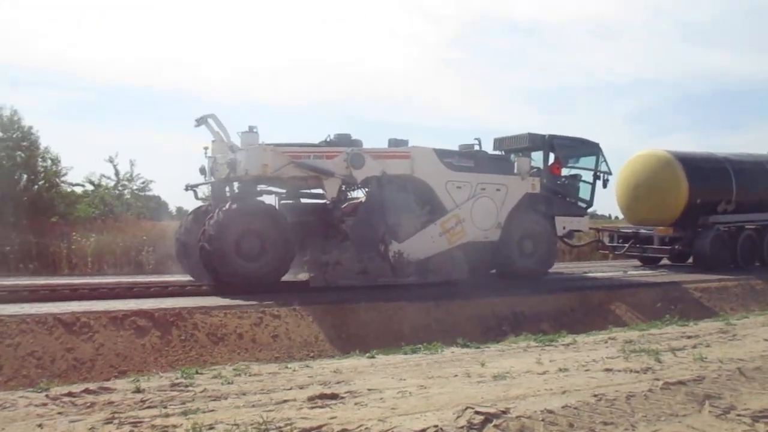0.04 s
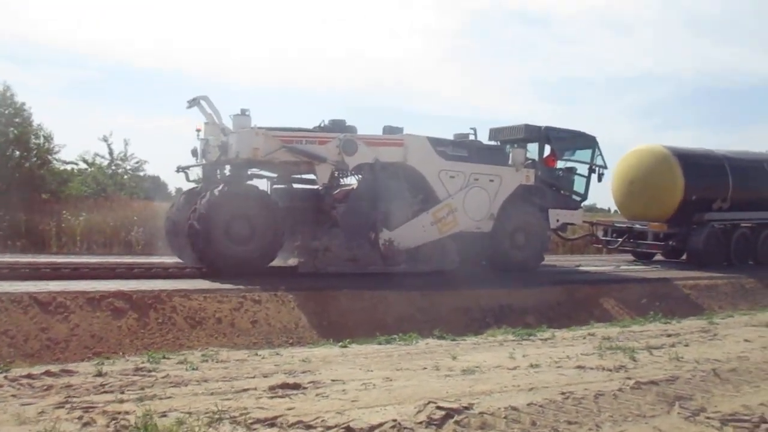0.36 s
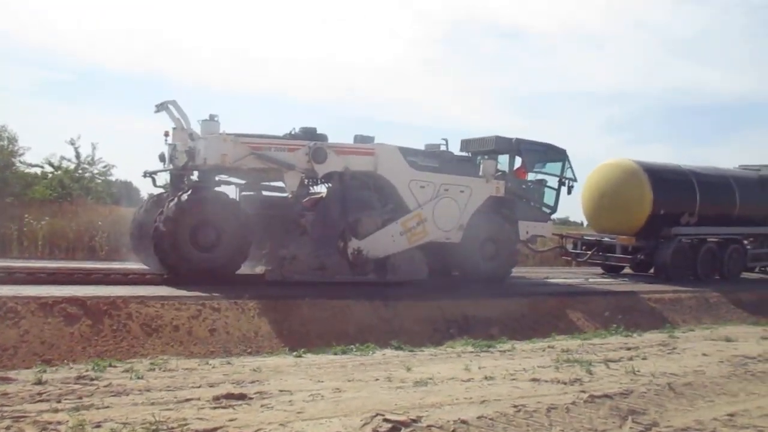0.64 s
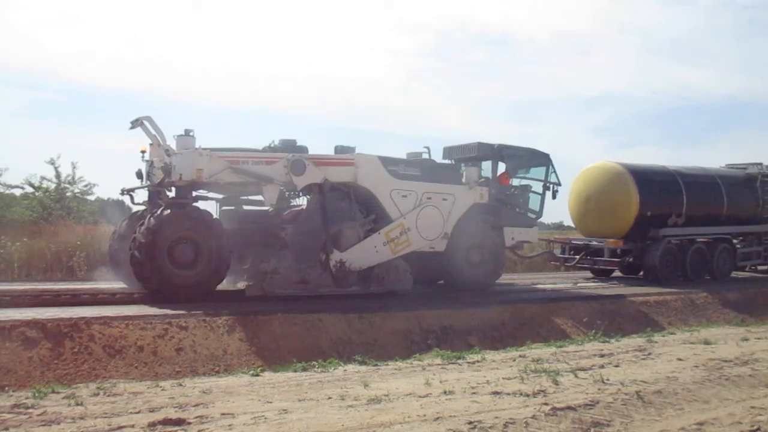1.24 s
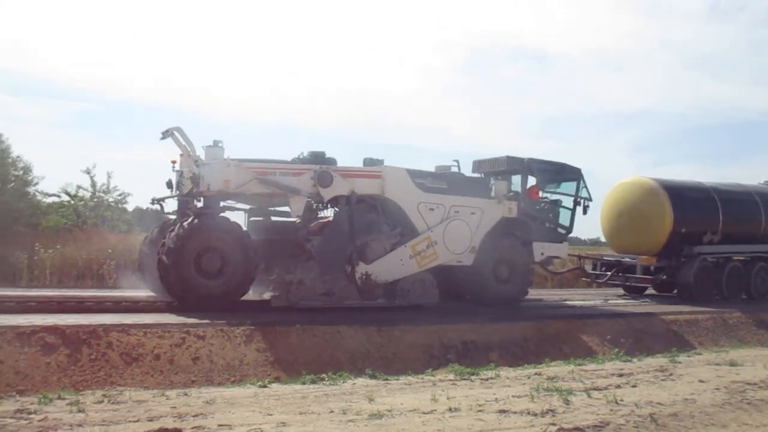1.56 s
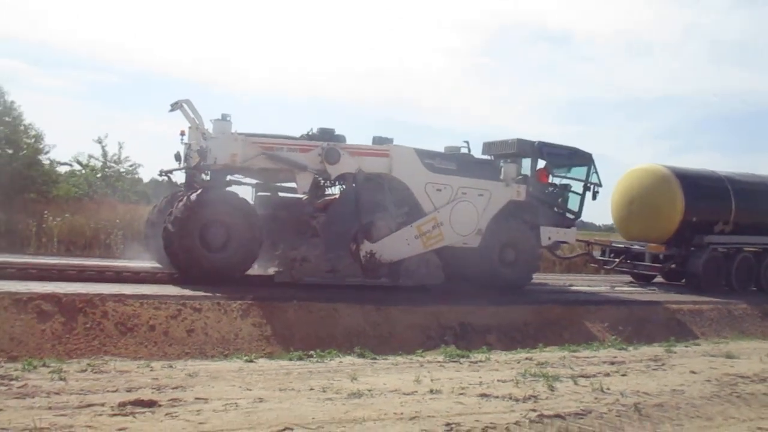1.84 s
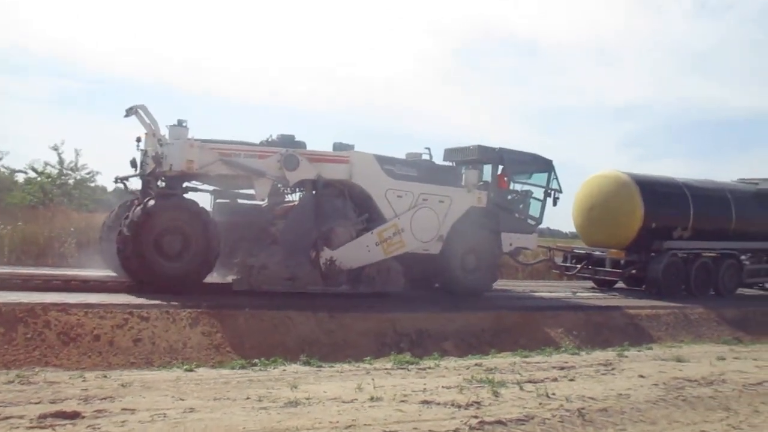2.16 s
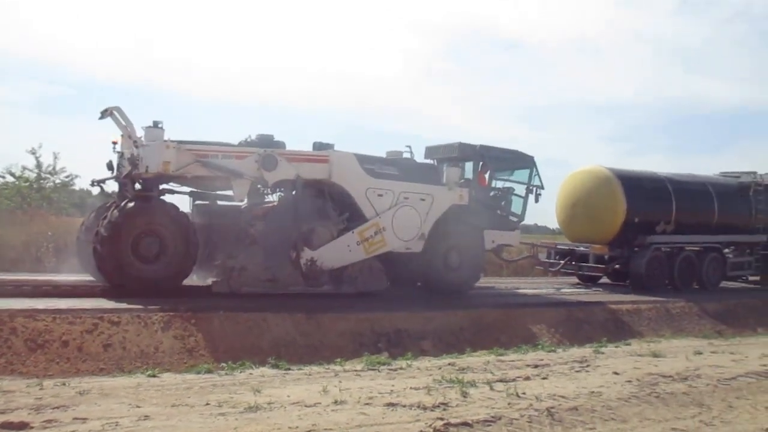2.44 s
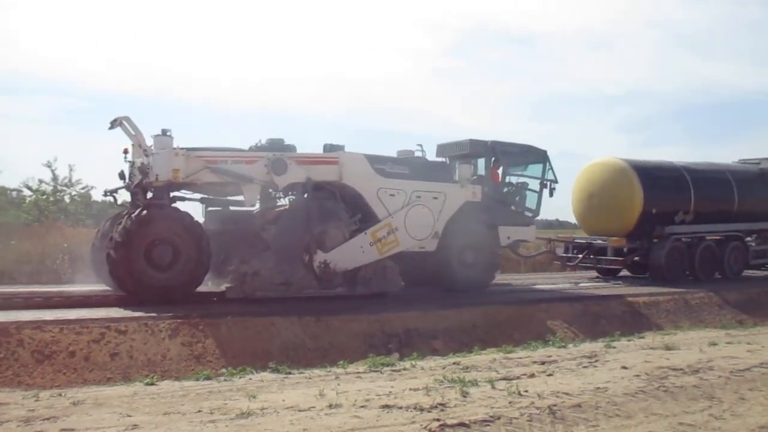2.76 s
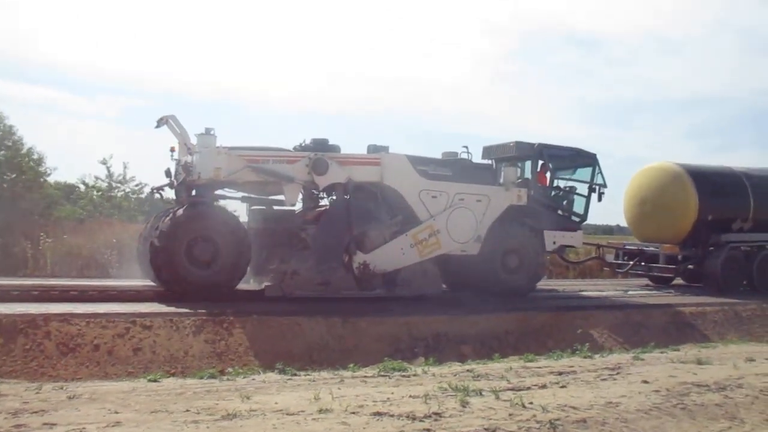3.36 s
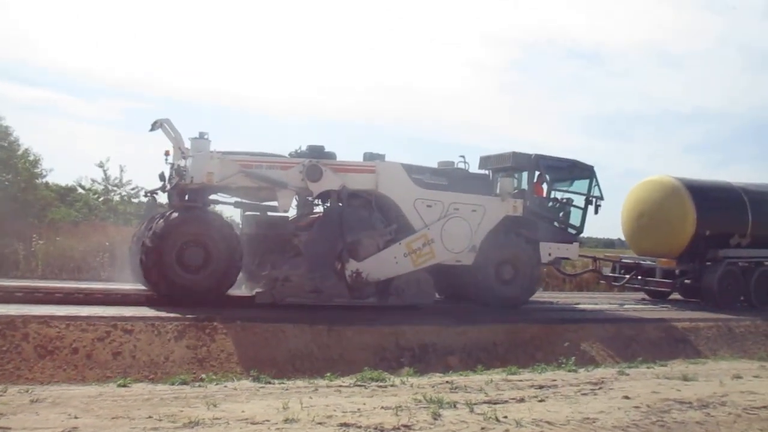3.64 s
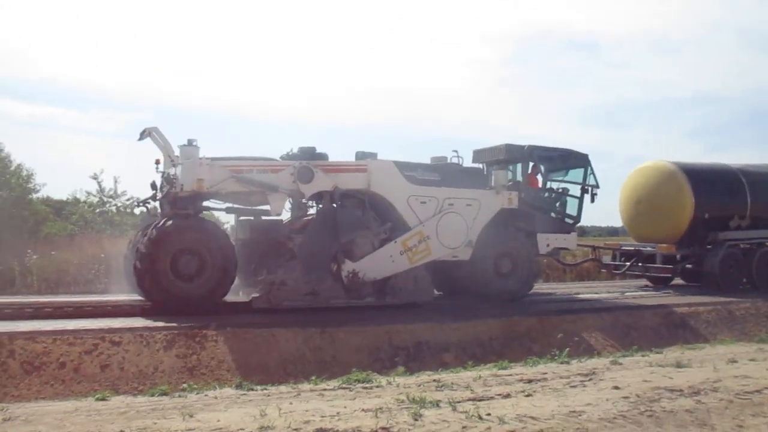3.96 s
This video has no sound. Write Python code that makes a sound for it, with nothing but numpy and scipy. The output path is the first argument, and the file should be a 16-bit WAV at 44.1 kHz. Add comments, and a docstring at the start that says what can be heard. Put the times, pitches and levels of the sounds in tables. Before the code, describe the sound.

A road recycling machine works steadily on open ground, its diesel engine droning and throbbing under the gritty roar of the milling drum. A gear whine and faint whistles sit on top, with occasional stone knocks, heard from some distance.

```python
"""Open ground, a hand-held microphone some twenty metres from a road recycler creeping past under load.
A six-cylinder diesel drones over the throb of a heavy, unbalanced shaft. The milling drum churns
asphalt and throws stones that ring its hood. A gear whines and a hydraulic pump hums. Thin whistles
and a steady, high electronic tone with a faint 30 Hz flutter lie on top.
The overall level dips abruptly a few times and creeps back."""
import sys
import numpy as np
from scipy import signal
from scipy.fft import rfft, irfft
from scipy.io import wavfile
from scipy.ndimage import uniform_filter1d, map_coordinates

SR = 44100
rng = np.random.default_rng(int(sys.argv[2]) if len(sys.argv) > 2 else 0)


def dump_mix(stems):
    """Bounce the given channels to the path in sys.argv[1] as a 16-bit WAV at rate SR."""
    frames = np.atleast_2d(stems).T  # one column per channel
    limited = np.clip(frames, -1, 1)  # hard clip at full scale
    pcm = np.round(limited * 32767).astype(np.int16)
    wavfile.write(sys.argv[1], SR, pcm)


N = 176400


def undb(db):
    """Decibels to gain."""
    return 10 ** (np.asarray(db) / 20)


def walk(per_s):
    """Smooth random drift that changes about per_s times a second; spread near 1."""
    hold = int(SR / per_s)
    steps = np.repeat(rng.standard_normal(N // hold + 3), hold)
    return 1.16 * uniform_filter1d(uniform_filter1d(steps, hold), hold)[hold:hold + N]


def turns(hz):
    """Angle of something that turns at hz."""
    return 2 * np.pi * np.cumsum(hz) / SR


def tone(angle, db):
    """A sine of a given rms level that starts anywhere in its cycle."""
    return np.sqrt(2) * undb(db) * np.sin(angle + rng.uniform(0, 2 * np.pi))


def curve(t, table, column=1):
    """One column of a table, joined by straight lines."""
    table = np.array(table)
    return np.interp(t, table[:, 0], table[:, column])


# dips of the overall level: t/s, depth/dB
DIPS = [(0, 4), (.14, 1.5), (.95, 0.5), (1.48, 1), (1.905, 2.8), (2.89, 3.5)]

def level_dips(t, fall_s=0.0064, recovery_s=0.45, gain_db=0.35):
    """Gain at the microphone: it drops quickly and recovers slowly."""
    down_db = 0
    for start, depth_db in DIPS:
        age = np.maximum(t - start, 0)
        down_db += depth_db * (1 - np.exp(-age / fall_s)) * np.exp(-age / recovery_s)
    return undb(gain_db - down_db)


# a faint reflection close to the microphone: t/s, lag/ms
REFLECTION_LAG = [(0, 1.235), (1.15, 1.25), (1.5, 1.285), (1.9, 1.255), (2.95, 1.262), (3.1, 1.22),
                  (4, 1.205)]

def add_reflection(t, sound, share=.42, from_hz=6500):
    """The treble arrives twice and combs; the lag shifts as the hand-held microphone moves."""
    hz = np.arange(N // 2 + 1) * SR / N
    treble = irfft(rfft(sound) * (1 - np.exp(-(hz / from_hz) ** 4)), N)
    late_index = (t - curve(t, REFLECTION_LAG) / 1000) * SR
    return sound + share * map_coordinates(treble, [late_index], mode="mirror")


# a faint line just below the gear whine, thin whistles, and an electronic tone (the pair near 11.8 kHz): f/Hz,
# level/dB, pitch wander as a share
HIGH_TONES = [(2278, -50.5, .001), (2890, -49, .005), (3420, -54, .006), (10215, -69.5, .002),
              (11793, -64.5, .00005), (11823, -73, .00005), (14610, -78, .003)]

def high_tones():
    """A faint line below the gear whine and thin whistles wander; a steady electronic tone beats with a weak
    neighbour, a faint 30 Hz flutter."""
    return sum(tone(turns(hz * (1 + wander * walk(60))), db + .5 * walk(12))
               for hz, db, wander in HIGH_TONES)


def pump_hum(t, crank, multiple=12.98, start_db=-40, rise_db_per_s=2.5):
    """The hydraulic pump turns with the crank; its hum grows as the machine goes by."""
    return tone(multiple * crank, start_db + rise_db_per_s * t + 1.3 * walk(9.9))


# the drive under load: t/s, engine speed/rpm, relative whine level/dB
DRIVE = [(0, 2008, -43), (.5, 2006, -42.5), (.8, 2016, -42.5), (1, 2012, -40), (1.35, 2013, -36.5),
         (1.8, 2016, -34.5), (2, 2008, -40.5), (2.5, 2013, -39), (2.85, 2018, -35.5), (3.05, 2012, -39.5),
         (3.2, 2013, -36), (3.55, 2021, -36.5), (4, 2021, -40)]
# gear mesh, its sidebands and weaker meshes: multiple of the crank speed, level/dB re the whine
GEAR_LINES = [(70.1, 1), (72, -15), (76.2, -30), (139, -22), (140.2, -22)]

def gear_whine(t, crank, gain_db=-1, waver_db=1.5):
    """Meshing teeth sing with the engine, unsteady in phase and level."""
    whine_db = curve(t, DRIVE, column=2) + gain_db
    return sum(tone(multiple * crank + 0.28 * walk(40), whine_db + db + waver_db * walk(45))
               for multiple, db in GEAR_LINES)


# low thumps: t/s, peak level/dB
THUMPS = [(1.903, -3), (2.889, -5)]

def thumps(t, width_s=0.0015):
    """Two dull blows, each a single pulse with no ring."""
    return sum(undb(db) * np.exp(-((t - start) / width_s) ** 2) for start, db in THUMPS)


# stones striking the hood: t/s, level/dB
STONES = [(.351, -9), (.837, -15), (1.477, -10), (2.174, -15), (2.353, -13), (2.64, -14), (2.688, -14),
          (3.385, -14), (3.888, -11)]
# modes of the hood: f/Hz, level/dB re the strike, t60/s
HOOD_MODES = [(290, -10.5, 0.046), (392, 1, 0.035), (610, -24, .04), (724, -3.5, 0.044), (798, -3, 0.054),
              (1130, -4, 0.018), (1850, -12, 0.022)]

def stone_knocks(t, contact_s=.0007, detune=0.033):
    """Larger stones ring the hood briefly, each at slightly different pitches."""
    out = np.zeros(N)
    for start, db in STONES:
        age = np.maximum(t - start, 0)
        attack = 1 - np.exp(-age / contact_s)
        for hz, mode_db, t60 in HOOD_MODES:
            pitch = hz * (1 + detune * rng.standard_normal())
            decay = np.exp(-np.log(1000) * age / t60)
            out += undb(db + mode_db) * attack * decay * np.sin(2 * np.pi * pitch * age)
    return out


def grit_and_air(crank, grains_per_s=7000, spread_db=2.5, grit_share=.3, pulse_depth=0.036):
    """Dense grit from the drum and rushing air that pulses with the engine, mixed by power."""
    hits = rng.random(N) < grains_per_s / SR
    grit = hits * rng.standard_normal(N)
    grit *= undb(spread_db * np.minimum(rng.exponential(size=N), 4))
    pulses = np.cos(3 * crank) + np.cos(2 * crank) + np.cos(crank / 2)
    air = rng.standard_normal(N) * (1 + pulse_depth * pulses)
    return np.sqrt(grit_share) * grit / grit.std() + np.sqrt(1 - grit_share) * air / air.std()


# drum, fan and engine block from twenty metres: f/Hz, level/dB per Hz
ROAR_SPECTRUM = [(15, -64), (25, -67), (40, -44.5), (70, -46), (200, -45.5), (280, -42), (340, -46),
                 (400, -44.5), (480, -52.5), (560, -52), (720, -46.5), (830, -48), (950, -53), (1200, -53),
                 (1480, -60), (1870, -59), (2150, -69), (2380, -63.5), (2650, -66.5), (2900, -64),
                 (3400, -67), (3900, -72.5), (4700, -72.5), (6000, -76.5), (6800, -82.5), (8300, -84.5),
                 (10000, -90), (11200, -94.5), (12500, -98), (14500, -102), (15500, -106)]
# swell of the hood's ring in the roar: t/s, level/dB
HOOD_SWELL = [(0, 1), (.55, -1.5), (.85, -0.5), (1.1, -1), (1.45, 2), (1.8, -0.5), (2.2, -1), (2.68, 1.8),
              (3, -0.4), (3.4, 0.5), (3.6, 0), (3.85, 3), (4, -1)]
# swell of the low rumble: t/s, level/dB
RUMBLE_SWELL = [(0, 6), (.25, 13), (.5, -4), (1.3, -0.5), (1.8, 3.5), (2.1, 1), (2.8, 3), (3.1, -1.5),
                (3.45, 2), (4, -8)]

def milling_roar(t, crank, hood_hz=745, hood_octaves=0.39, rumble_hz=90, rumble_octaves=0.97):
    """Grit and air, coloured by hood and body; each half-octave band swells and flickers."""
    octave = np.log2(np.maximum(np.arange(N // 2 + 1) * SR / N, 1))
    hz, db = np.array(ROAR_SPECTRUM).T
    colour = undb(np.interp(octave, np.log2(hz), db)) * np.sqrt(SR / 2)
    spectrum = rfft(grit_and_air(crank)) * colour
    churn_db = .2 * walk(14)
    out = np.zeros(N)
    for centre in np.arange(3.5, 14.6, .5):  # octaves above 1 Hz
        band = irfft(spectrum * np.maximum(1 - 2 * abs(octave - centre), 0), N)
        hood_db = np.exp(-((centre - np.log2(hood_hz)) / hood_octaves) ** 2) * curve(t, HOOD_SWELL)
        rumble_weight = np.exp(-((centre - np.log2(rumble_hz)) / rumble_octaves) ** 2)
        rumble_db = rumble_weight * curve(t, RUMBLE_SWELL)
        flicker_db = 0.33 * walk(16) / (1 + 2 ** centre / 3000)  # steadier in the treble
        out += band * undb(flicker_db + churn_db + hood_db + rumble_db)
    return out


# lines of the unbalanced shaft: multiple of its speed, level/dB
SHAFT_LINES = [(1, -17.5), (2, -31), (3, -29)]

def shaft_throb(hz=34.04, jitter=0.00114):
    """A heavy shaft throbs; its third line beats slowly against the firings."""
    angle = turns(hz * (1 + jitter * walk(2.88)))
    return sum(tone(multiple * angle, db + 0.35 * walk(6.9)) for multiple, db in SHAFT_LINES)


# the exhaust across open ground: multiple of the crank speed, level/dB
EXHAUST_LINES = [(1.5, -34.5), (2.5, -37.5), (3, -27), (4.5, -24.5), (5, -35), (6, -26.5), (7, -39),
                 (7.5, -34.5)]

def diesel_exhaust(crank, waver_db=1.5):
    """Six cylinders fire three times a turn; being unequal, they add lines between the harmonics."""
    return sum(tone(multiple * crank, db + waver_db * walk(5)) for multiple, db in EXHAUST_LINES)


def scene():
    """Machine and high tones in one channel; one crankshaft drives exhaust, pump and gear."""
    t = np.arange(N) / SR
    rpm = curve(t, DRIVE) * (1 + 0.00072 * walk(8))  # slight speed jitter
    crank = turns(rpm / 60)
    drone = diesel_exhaust(crank) + pump_hum(t, crank) + shaft_throb()
    tones = gear_whine(t, crank) + high_tones()
    roar = add_reflection(t, milling_roar(t, crank))
    mix = drone + tones + roar + stone_knocks(t) + thumps(t)
    return (mix * level_dips(t))[None]


def record(dry):
    """The recorder cuts the deepest bass and the top."""
    low_cut = signal.butter(2, 16, "high", fs=SR, output="sos")
    high_cut = signal.ellip(10, .1, 80, 15650, fs=SR, output="sos")
    return signal.sosfilt(high_cut, signal.sosfilt(low_cut, dry))


dry = scene()
out = record(dry)
dump_mix(out)
```